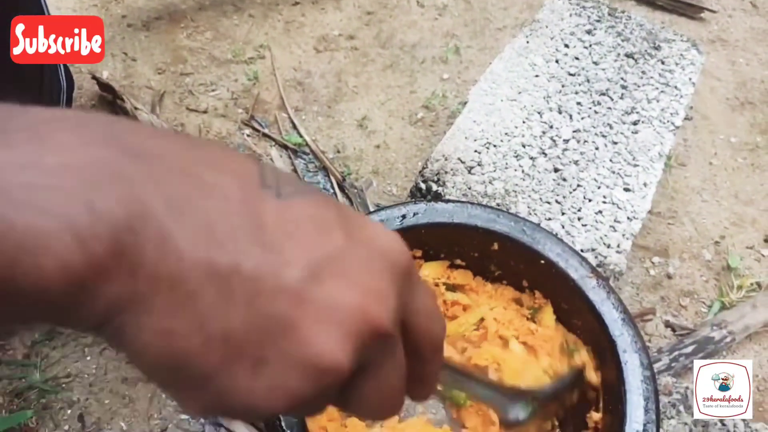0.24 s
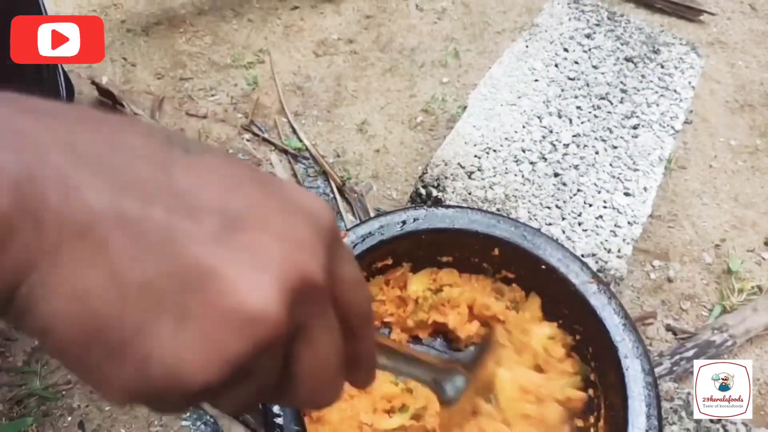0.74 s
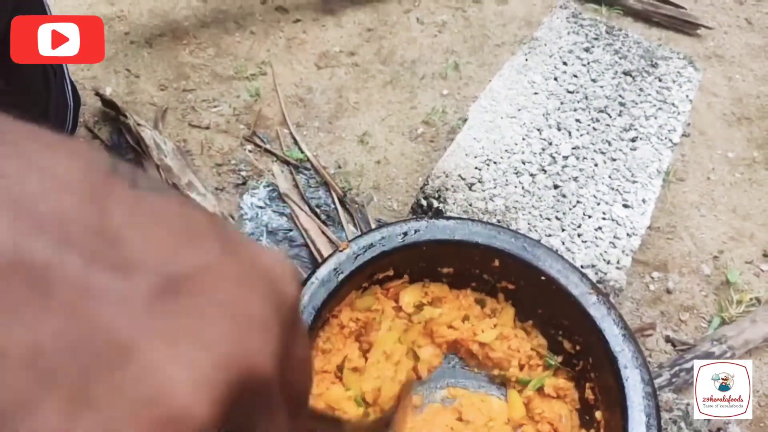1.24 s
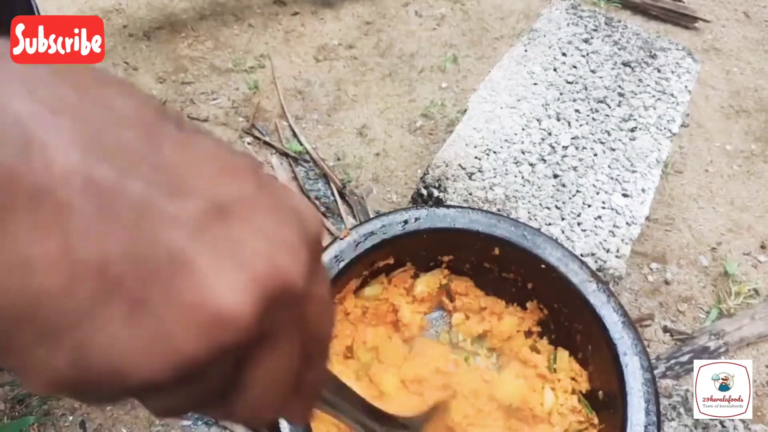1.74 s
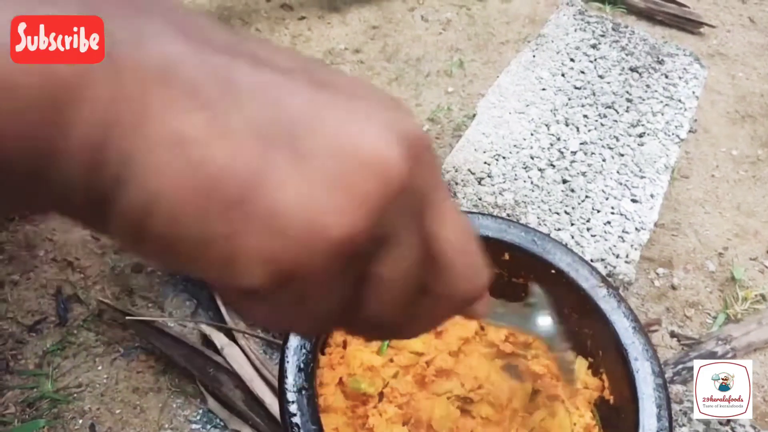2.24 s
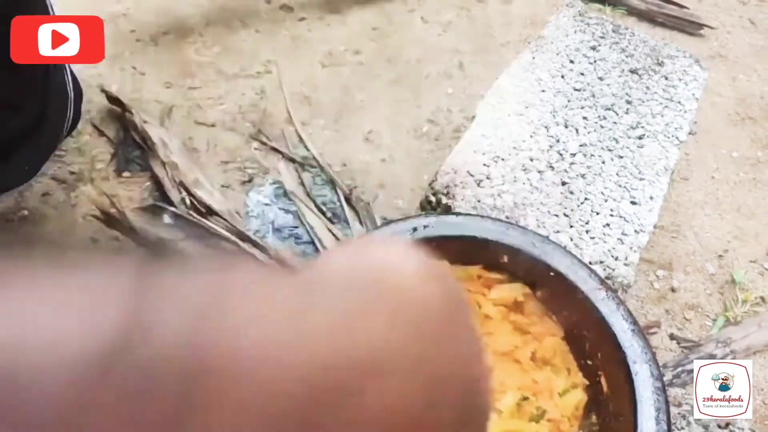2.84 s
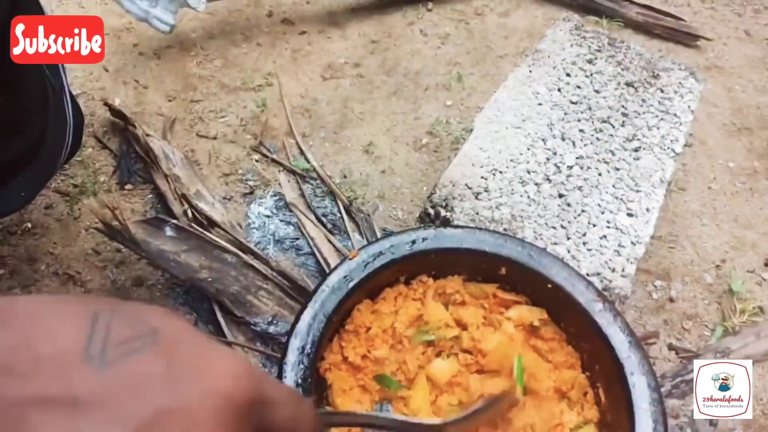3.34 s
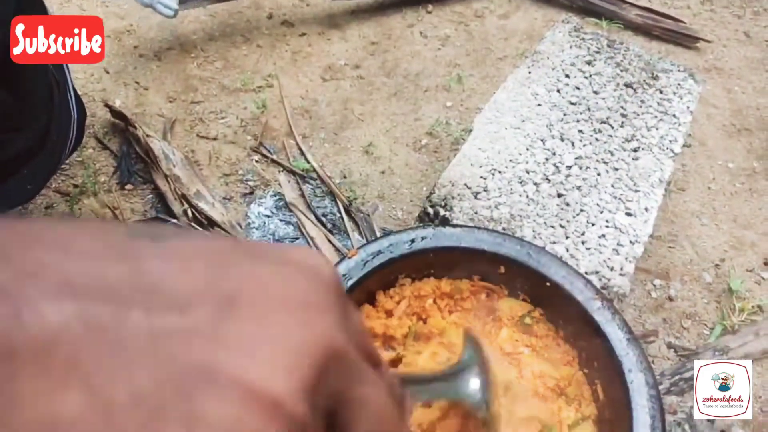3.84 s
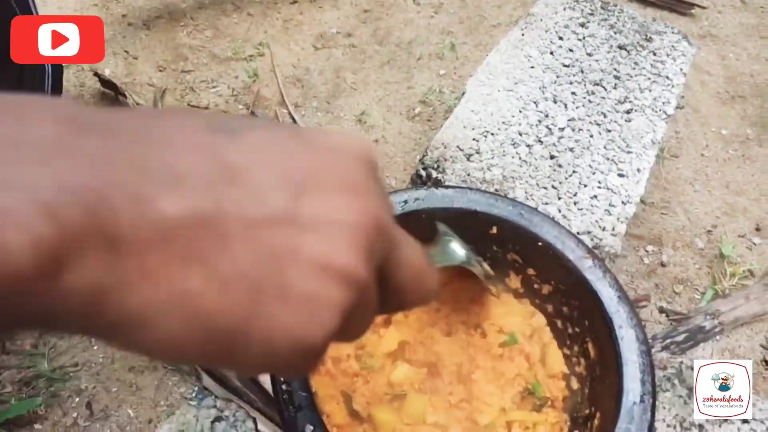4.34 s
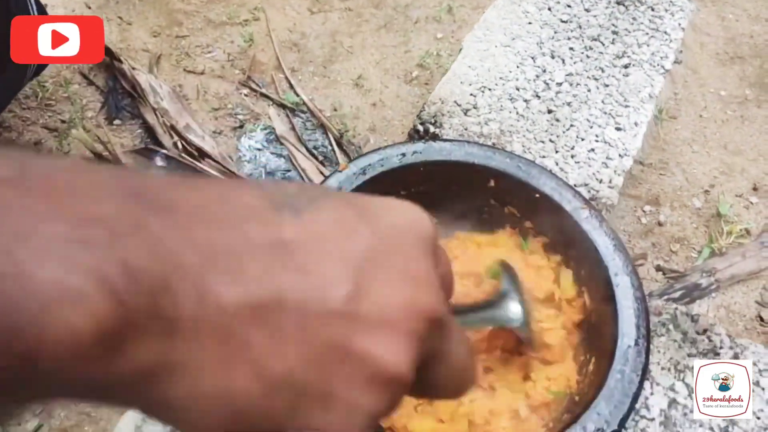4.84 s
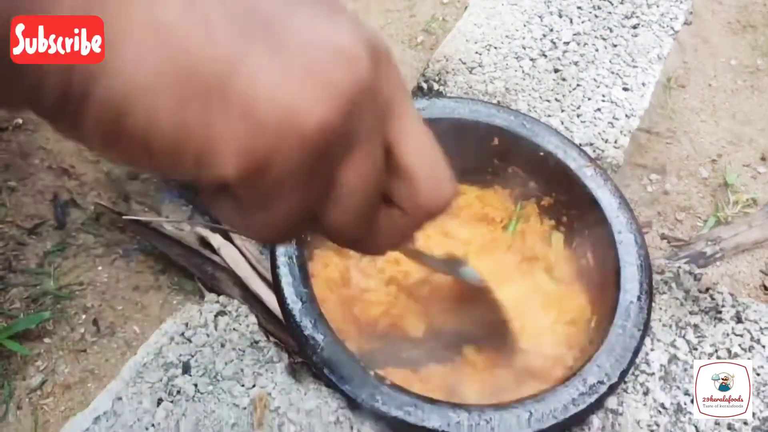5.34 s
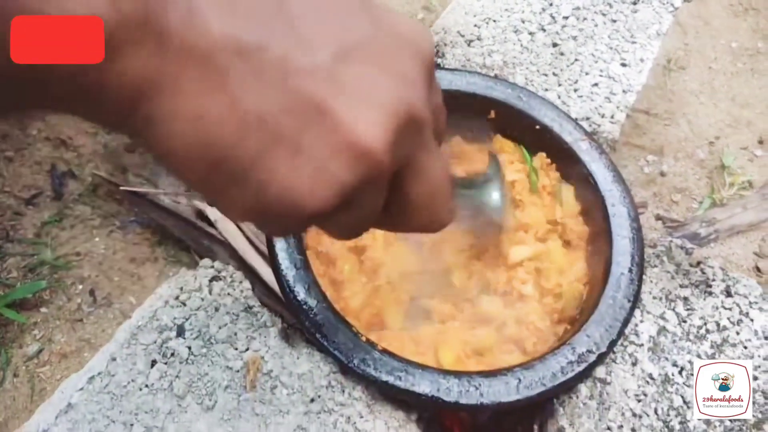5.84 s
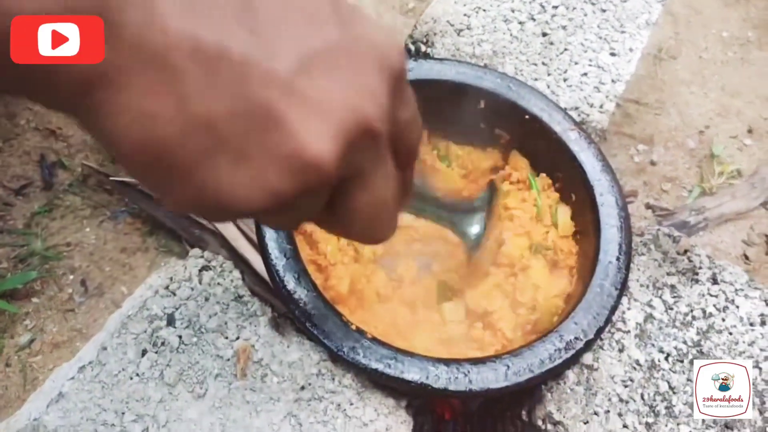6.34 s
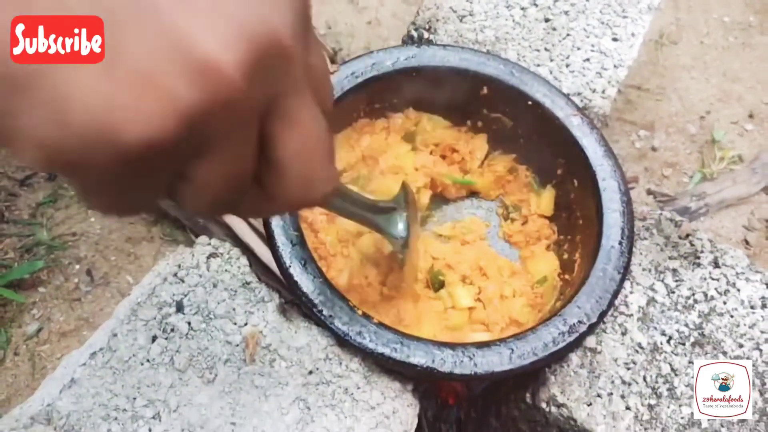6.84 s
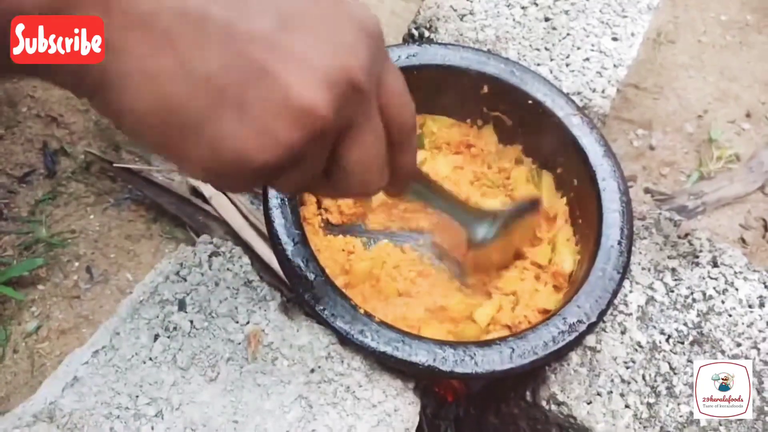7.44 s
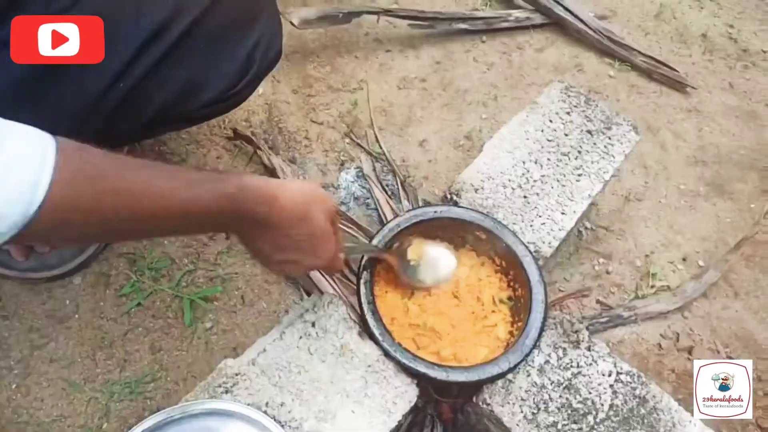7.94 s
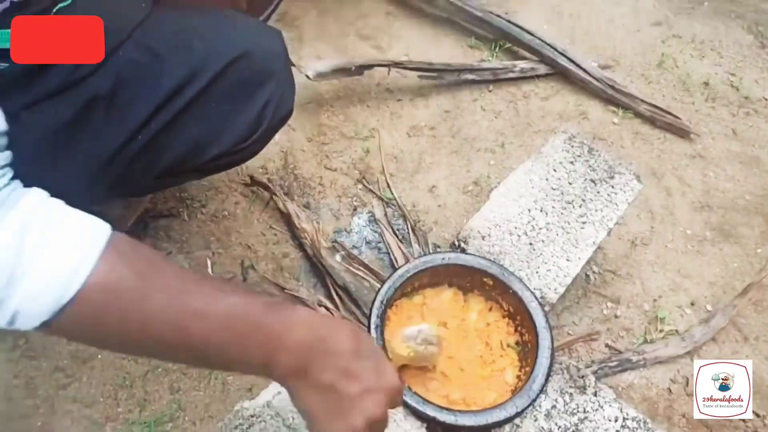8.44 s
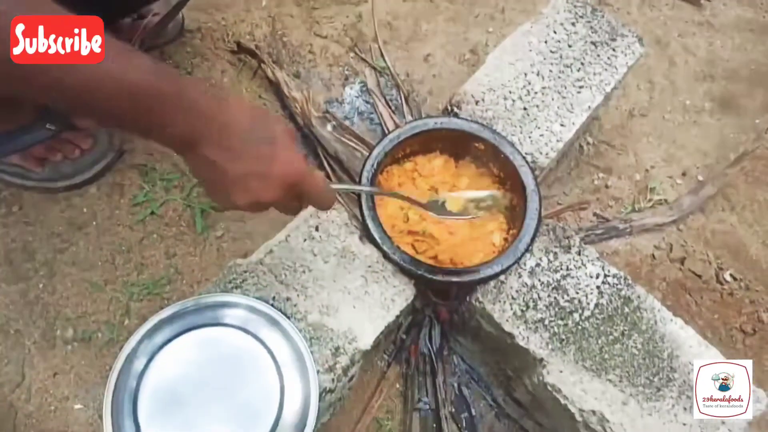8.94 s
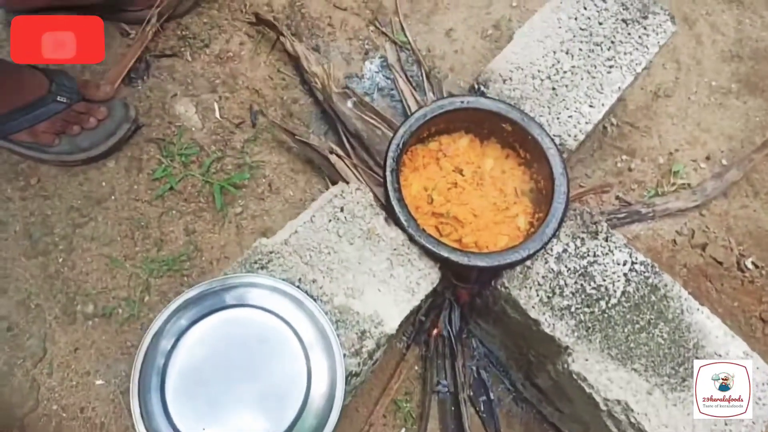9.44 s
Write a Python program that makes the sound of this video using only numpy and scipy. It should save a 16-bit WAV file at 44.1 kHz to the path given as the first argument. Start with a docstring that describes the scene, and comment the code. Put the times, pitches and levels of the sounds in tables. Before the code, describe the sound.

A steel spoon works through thick curry in a clay pot, rasping over the wall, thudding through the food and clinking on bare clay, with light squelches and occasional squeaks. A soft, steady sizzle runs underneath, heard close up in stereo outdoors. The strokes slacken briefly around three seconds in and resume, until spoon and sizzle stop abruptly and only quiet outdoor air remains.

```python
"""Outdoors at a wood fire, stereo microphone close to a heavy clay pot of thick, softly sizzling curry. Almost
at once a steel spoon starts to stir: it drags grit over the clay, pops wet pockets, squeaks, knocks through the
food and clinks on the bare wall. Near 3 s it eases off for a second, then stirs on. At 7.7 s the scene changes
at once, and only quiet outdoor air is heard."""
import sys
import numpy as np
from scipy import signal
from scipy.fft import rfft, irfft
from scipy.io import wavfile
from scipy.ndimage import map_coordinates

SR = 44100
rng = np.random.default_rng(int(sys.argv[2]) if len(sys.argv) > 2 else 0)


def file_out(sig):
    """Save sig as 16-bit WAV at sys.argv[1]."""
    # one column per channel
    cols = np.atleast_2d(sig).T
    # limit, then scale
    lim = np.clip(cols, -1, 1)
    pcm = np.round(lim * 32767).astype(np.int16)
    wavfile.write(sys.argv[1], SR, pcm)


N = 427329
TIME = np.arange(N) / SR

# open air around the fireplace: f/Hz, relative density/dB
AIR_SPECTRUM = [(18, -61), (30, -31), (59, -21), (153, 1.5), (184, -6), (259, -1), (486, -10), (702, -10.5),
                (1390, -18), (2410, -16.5), (7870, -28), (8740, -31), (9460, -31.5), (11100, -31),
                (16000, -32)]
# how alike the air is on both sides of the microphone: f/Hz, left-right likeness
AIR_LIKENESS = [(60, 1.0), (240, 1.0), (950, 1.0), (3770, 1.0), (15000, 0.98)]
# curry frying close by: f/Hz, relative density/dB
SIZZLE_SPECTRUM = [(20, -21), (45, -7), (70, 0.5), (105, 3), (200, 0.5), (400, -3.5), (700, -1),
                   (1200, -7.5), (2400, -12), (4100, -10), (5300, -18), (6600, -8), (8400, -15),
                   (12500, -17.5), (15500, -14)]
# how alike the sizzle is on both sides: f/Hz, left-right likeness
SIZZLE_LIKENESS = [(60, .15), (150, 0.55), (600, 0.82), (1500, 0.2), (4000, 0.16), (14000, 0.18)]
# rise and fall of the sizzle's treble: t/s, gain/dB
FIZZ_GAIN = [(0, 0), (1.3, .8), (1.85, 2.5), (2.3, 0.4), (3.6, -0.1), (5.1, 1), (6.45, -2), (7.0, 2),
             (7.4, 1)]
# faint, thin whistles over the sizzle: t/s, length/s, first f/Hz, last f/Hz, level/dB
THIN_WHISTLES = [(0, 0.26, 3950, 4050, -57.5), (.3, 0.36, 4000, 4060, -61), (2.2, 0.13, 3500, 3610, -54.5)]
# resonances of the hollow pot: f/Hz, width/Hz, level/dB
BODY_MODES = [(104, 60, -20), (265, 63, -8.5), (322, 87, -4), (461, 150, -0.5), (606, 260, -1),
              (810, 110, -2.5), (1060, 390, -11.5)]
# resonances of its clay wall: f/Hz, width/Hz, level/dB
WALL_MODES = [(1070, 1170, 1), (1510, 200, 3), (1810, 270, 0), (2160, 520, 0), (2504, 150, -1),
              (2783, 27, -0.5), (3255, 370, -0.5)]
# resonances of the spoon: f/Hz, width/Hz, level/dB
STEEL_MODES = [(3830, 480, 0.5), (4336, 440, 1.5), (4900, 1600, -5.5), (5680, 240, -4), (6470, 510, 4),
               (6860, 160, 6.5), (7490, 330, 3.5), (8280, 570, 2), (9100, 170, 2), (11270, 5600, -7.5),
               (14900, 790, -9), (14120, 500, -7), (15200, 1000, -8.5)]
# the spoon's edge squeaks along the wall: t/s, length/s, first f/Hz, last f/Hz, level/dB
EDGE_SQUEAKS = [(1.255, 0.031, 2370, 2250, -38.5), (2.548, 0.025, 4110, 3870, -30),
                (2.6, 0.042, 4350, 4350, -32), (5.64, 0.058, 1830, 1800, -35),
                (6.06, 0.12, 2110, 1830, -38.5), (6.122, 0.045, 1870, 1680, -32),
                (6.14, 0.17, 1800, 1750, -46.5), (6.198, 0.017, 1780, 1750, -27.5)]
# scraping strokes: t/s, length/s, force/dB, swell over the stroke/dB, wall against force/dB,
# steel against force/dB, brightening as the food is pushed aside/dB
SPOON_STROKES = [(0.307, 0.094, -29, 0.5, -6.5, -5, -7), (0.691, .015, -44, 8, -2, 0, 0),
                 (0.724, 0.1, -25, -4.5, -5, -5, -3), (1.053, 0.18, -26, 3, -9.5, -10, 2),
                 (1.354, 0.081, -31.5, -14.5, -2.5, -0.5, 0), (1.486, 0.16, -28, -9, -6, -2.5, 13),
                 (1.666, 0.011, -42, 4, 1, -16, 0), (2.019, 0.069, -29.5, -6, -5.5, -2.5, 0),
                 (2.148, 0.013, -41, -3, -6, -1, 1), (2.429, 0.035, -46, 8, 3, 8.5, 1),
                 (2.55, 0.097, -28, -7, -6, 3, -0.5), (2.684, 0.088, -45, -0.5, -5, -2, 3.5),
                 (2.859, 0.028, -37, -1, -3, -6, 0), (2.915, 0.014, -38, 1, -1, -0.5, -2),
                 (2.976, 0.033, -40, -2, 0, -1.5, -2), (4.132, 0.12, -37.5, 3.5, -5, 3.5, 0.5),
                 (4.308, 0.054, -38, -10, -3.5, 3, 10), (4.401, 0.02, -32.5, -0.5, -8, -1.5, -4),
                 (4.464, 0.057, -26, 0.5, -2.5, 5.5, -4), (4.525, 0.095, -31.5, -8, -7, -10, 5),
                 (4.862, 0.027, -32, -8.5, -9.5, -8, -2), (4.918, 0.088, -24, 1, -13, -17, 9.5),
                 (5.286, 0.018, -38.5, -8, 2.5, 3, 1), (5.363, 0.088, -23.5, -1, -10.5, -11, -4),
                 (5.489, 0.011, -33.5, 0, -11, -7, -6), (5.585, 0.087, -29, 7, -6.5, -10, -4.5),
                 (5.807, .105, -23.5, -7, -5, -6.5, 0.5), (5.926, 0.021, -33, -3, -5.5, -6, -3.5),
                 (6.015, 0.039, -33, -4, -10, -13, 7), (6.103, 0.26, -31, 5, -10.5, -12, -6),
                 (6.307, 0.039, -25.5, 2.5, -0.5, 1.5, -4), (6.766, .11, -26, -4, -7.5, -7, 3.5),
                 (7.11, 0.037, -36.5, -6.5, 2, 4, -4), (7.16, .097, -25.5, 1.5, -6, -5.5, -5),
                 (7.535, 0.22, -28, -8.5, -8.5, -7, 8)]
# the spoon meets the pot through a cushion of food: t/s, level/dB
FOOD_KNOCKS = [(0.0803, -28.5), (0.2822, -16.5), (0.3953, -21.5), (0.8254, -15), (0.9353, -33),
               (1.0655, -20.5), (1.1282, -23.5), (1.5209, -25.5), (1.6762, -32), (1.7824, -27),
               (2.0739, -36), (2.1706, -28), (2.4811, -16.5), (3.5625, -44), (3.8215, -39), (4.1243, -31.5),
               (4.2262, -25.5), (4.6355, -34), (4.8634, -20.7), (4.9726, -22.5), (5.3559, -28), (5.56, -26),
               (5.5752, -18.5), (5.79, -27.2), (6.7673, -26), (7.2168, -22), (7.2836, -22.5), (7.3963, -27),
               (7.427, -38), (7.4715, -36.5)]
# the spoon strikes bare clay: t/s, body/dB, wall/dB, steel/dB, chatter time/s, favoured ring f/Hz
CLAY_CLINKS = [(0.366, -29, -36, -28.5, 0.00088, 6420), (0.7126, -15.5, -25.5, -28, 0.0011, 6400),
               (0.729, -28.5, -43.5, -23.5, 0.00054, 8200), (0.7569, -22.5, -41.5, -23.5, 0.0006, 8120),
               (1.0498, -20.5, -25.5, -23, 0.002, 3970), (1.3552, -12.5, -13.5, -15.5, .0018, 4290),
               (1.4356, -22.5, -22, -33, 0.00084, 2300), (2.4413, -31, -32.5, -20, 0.0017, 6390),
               (2.4577, -25, -31, -26, 0.0027, 6670), (2.5505, -22, -35, -18.5, 0.00097, 6870),
               (2.5605, -30, -24, -23, 0.0015, 6850), (2.5775, -36, -35.5, -22, 0.0012, 7540),
               (2.611, -29, -36.5, -28.5, 0.00073, 4400), (2.6277, -30.5, -29, -24, .0011, 4260),
               (2.655, -27, -27.5, -21, 0.0015, 4330), (2.9201, -37, -35.5, -39, 0.0019, 2560),
               (2.977, -53, -37, -38, 0.0029, 2400), (3.762, -21.5, -25, -33.5, 0.00058, 1250),
               (4.164, -30, -57, -21, 0.00086, 6960), (4.4558, -20, -41.5, -24, .0003, 6430),
               (4.4988, -28, -37, -23.5, 0.0013, 6830), (4.8463, -22.5, -33, -39, 0.001, 3850),
               (5.29, -21.5, -23.5, -22, 0.0024, 4290), (6.0933, -39, -37.5, -39, 0.00087, 1920),
               (6.202, -32, -61, -54, .0018, 1810), (6.7355, -19, -32, -22.5, 0.00038, 6700),
               (6.842, -25, -28.5, -30.5, 0.0012, 6200), (7.0975, -22, -21, -12.5, 0.0023, 7490),
               (7.1562, -21, -20, -22, 0.0023, 7430)]
# landing nearer its thin edge, the spoon rings higher and brighter: favoured ring f/Hz, brightness/dB
EDGE_BRIGHTENING = [(2500, -9.5), (4200, -4.5), (6400, 5.5), (8000, 9)]
# the range that the thin edge brings out: f/Hz, weight of the brightness
EDGE_WEIGHT = [(4300, 0), (6500, .75), (8800, 1.2), (12000, 1.4), (16000, 0.81)]
# the pot's treble favours the left microphone: f/Hz, left minus right at full share/dB
LEFT_LEAN = [(800, 0.5), (1800, 0.5), (3200, -0.5), (5000, 5), (6500, 4.5), (8300, 3.5), (10000, 16),
             (12000, 6.5), (15000, 15)]
# a hollow in the treble of the cooking: f/Hz, gain/dB
TREBLE_DIP = [(8450, -1), (8700, -12), (9500, -8.5), (10400, -12.5), (11400, -27), (11650, -2.5)]


def amp(db):
    """Decibels to gain."""
    return 10 ** (np.asarray(db) / 20)


def unit_rms(x):
    """Scales to rms 1."""
    return x / np.sqrt(np.mean(x ** 2) + 1e-20)


def curve_at(points, hz):
    """Reads a curve on a log-frequency axis."""
    f, value = np.transpose(points)
    return np.interp(np.log(hz + 1), np.log(f + 1), value)


def equalise(x, gain):
    """Filters x by a gain that is a function of frequency."""
    return irfft(rfft(x) * gain(np.fft.rfftfreq(x.shape[-1], 1 / SR)), x.shape[-1])


def wander(hz):
    """Random drift of rms 1, up to the given rate."""
    knots = rng.standard_normal(N // 20)
    return unit_rms(np.interp(TIME * hz, np.arange(len(knots)), knots))


def stereo(a, b, likeness):
    """Two unrelated signals become a left and a right of the given likeness."""
    return np.array([a, likeness * a + np.sqrt(1 - likeness ** 2) * b])


def grit(per_s, spread_db):
    """Random tiny clicks, a few of them much larger than the rest."""
    size = amp(spread_db * np.minimum(rng.exponential(1, N), 4))
    return unit_rms(size * rng.choice([-1, 1], N) * (rng.random(N) < per_s / SR))


def bed(a, b, spectrum, likeness):
    """Colours two unrelated signals into one stereo background of rms 1."""
    hz = np.fft.rfftfreq(N, 1 / SR)
    sides = stereo(rfft(a), rfft(b), curve_at(likeness, hz))
    return unit_rms(irfft(sides * amp(curve_at(spectrum, hz)), N))


def air(level_db=-63):
    """Faint, steady open air, almost the same on both sides."""
    return amp(level_db) * bed(*rng.standard_normal((2, N)), AIR_SPECTRUM, AIR_LIKENESS)


def sizzle(level_db=-42.5):
    """Countless steam bubbles burst in the hot curry; their fizz comes and goes."""
    bubbles = [grit(per_s=9000, spread_db=3.5) for side in range(2)]
    frying = amp(level_db + 0.52 * wander(hz=9)) * bed(*bubbles, SIZZLE_SPECTRUM, SIZZLE_LIKENESS)
    fizz = equalise(frying, lambda hz: 1 / (1 + (2000 / (hz + 1)) ** 2))
    fizz_db = np.interp(TIME, *np.transpose(FIZZ_GAIN))
    return frying + fizz * (amp(fizz_db) - 1)


def moving_resonance(x, hz, width_hz):
    """Shifts the pitch curve hz down to zero, smooths twice, and shifts back."""
    turn = np.exp(2j * np.pi * np.cumsum(hz) / SR)
    pole = np.exp(-np.pi * width_hz / SR)
    return (turn * signal.lfilter([(1 - pole) ** 2], [1, -2 * pole, pole ** 2], x / turn)).real


def glides(rows, width_hz, likeness):
    """Whistles or squeaks: rough, narrow tones that swell, slide in pitch and fade."""
    out = np.zeros((2, N))
    for start, length, first_hz, last_hz, db in rows:
        count = int(length * SR)
        noise = stereo(*rng.standard_normal((2, N))[:, :count], likeness)
        tone = moving_resonance(noise, np.linspace(first_hz, last_hz, count), width_hz)
        part = out[:, round(start * SR):][:, :count]
        part += amp(db) * unit_rms(tone * signal.windows.tukey(count, .7))
    return out


def ring(modes, narrowest_hz=70, size=4096):
    """Impulse response of steep-sided resonances; food and hand damp them, so none rings for long."""
    hz = np.abs(np.fft.fftfreq(2 * size, 1 / SR)) + 1
    power = sum(amp(db) ** 2 / (1 + ((hz / f - f / hz) * f / max(width, narrowest_hz)) ** 2) ** 2
                for f, width, db in modes)
    log_gain = .5 * np.log(power + 1e-9)
    minimum_phase = np.exp(np.conj(signal.hilbert(log_gain)))
    return np.fft.ifft(minimum_phase).real[None, :size]


def excite(force, response):
    """Lets a stereo force ring through a response."""
    return signal.fftconvolve(force, response, axes=1)[:, :force.shape[1]]


def pressure(dig_db_per_s=521, land_db_per_s=1100.5, lift_db_per_s=381, drag_db_per_s=127.5):
    """Body, wall and steel levels in dB: each stroke digs in, holds while it bares the clay, lifts off."""
    power = np.zeros((3, N))
    for start, length, force_db, swell_db, wall_db, steel_db, baring_db in SPOON_STROKES:
        near = slice(max(round((start - .3) * SR), 0), round((start + length + .3) * SR))
        t = TIME[near] - start
        early, late = np.maximum(-t, 0), np.maximum(t - length, 0)
        along = np.clip(t / length, 0, 1) - .5
        arch_db = .5 - (2 * along) ** 2
        held_db = force_db + swell_db * along + arch_db
        bared_db = held_db + baring_db * along
        # a stroke that begins with a clink is there almost at once
        landed = min(abs(start - clink[0]) for clink in CLAY_CLINKS) < .015
        contact = amp(-(land_db_per_s if landed else dig_db_per_s) * early - lift_db_per_s * late)
        # the spoon drags lightly through food before and after
        drag = amp(-24.5 - drag_db_per_s * (early + late) - (land_db_per_s * early if landed else 0))
        power[:, near] += ((contact + drag) * amp([held_db, bared_db + wall_db, bared_db + steel_db])) ** 2
    return 10 * np.log10(power + 1e-12)


def squelch(low_hz=700, high_hz=3970, decay_cycles=2.5, against_wall_db=-8):
    """Wet pockets in the curry pop at many pitches wherever the spoon presses through."""
    t, pops = np.arange(600) / SR, np.zeros((2, N))
    for hz in np.geomspace(low_hz, high_hz, 12):
        pop = np.sin(2 * np.pi * hz * t) * np.exp(-hz * t / decay_cycles)
        side_gain = amp(rng.normal(0, 2, (2, 1)))
        pops += side_gain * signal.oaconvolve(grit(per_s=9, spread_db=1.5), pop)[:N]
    wall_db = pressure()[1]
    return unit_rms(pops) * amp(against_wall_db + wall_db)


def add_blow(mix, start, db, sound):
    """Adds a short stereo sound whose level is counted over 10 ms."""
    power = np.sum(sound ** 2) / 2 / (SR / 100)
    part = mix[:, round(start * SR):][:, :sound.shape[1]]
    part += amp(db) * sound[:, :part.shape[1]] / np.sqrt(power + 1e-20)


def thud(hz, body, decay_s=0.0011, ring_db=-8, cushion_hz=1300):
    """A blow swells and dies in two or three cycles, dulled by the food; the pot rings on faintly."""
    t = np.arange(4096) / SR
    push = unit_rms(t * np.exp(-t / decay_s) * np.sin(2 * np.pi * hz * t))
    tremor = rng.standard_normal(len(t)) * np.exp(-t / 0.0075) * (1 - np.exp(-t / 0.0018))
    blow = push + amp(ring_db) * unit_rms(excite(np.array([tremor, tremor]), body))
    return signal.sosfilt(signal.butter(2, cushion_hz, fs=SR, output="sos"), blow)


def knocks(body, pitch_hz=546.7, scatter=0.035):
    """Dull blows through the food, each at a slightly different pitch."""
    out = np.zeros((2, N))
    for start, db in FOOD_KNOCKS:
        add_blow(out, start, db, thud(pitch_hz * (1 + scatter * rng.standard_normal()), body))
    return out


def struck(modes, ring_hz, scatter_db=1.9, favour_db=5):
    """Each blow lands elsewhere: resonances near ring_hz stand out, and all are weighted anew."""
    hz, width, db = np.transpose(modes)
    favour = np.exp(-((hz - ring_hz) / 260) ** 2)
    return ring(zip(hz, width, db + favour_db * favour + scatter_db * rng.standard_normal(len(hz))))


def clinks(body):
    """On bare clay the steel chatters for a few milliseconds while the pot thuds."""
    out, t = np.zeros((2, N)), np.arange(4096) / SR
    for start, body_db, wall_db, steel_db, chatter_s, ring_hz in CLAY_CLINKS:
        chatter = t / chatter_s * np.exp(-t / chatter_s) + 0.046 * np.exp(-t / 0.032)
        contact = rng.standard_normal((2, len(t))) * chatter
        bright_db = curve_at(EDGE_BRIGHTENING, ring_hz)
        steel = excite(stereo(*contact, likeness=0.2), struck(STEEL_MODES, ring_hz))
        steel = equalise(steel, lambda hz: amp(bright_db * curve_at(EDGE_WEIGHT, hz)))
        steel *= amp(.35 * bright_db * np.array([[.5], [-.5]]))  # a brighter blow lies further left
        add_blow(out, start, steel_db, steel)
        add_blow(out, start, body_db, thud(607, body, decay_s=0.0012, ring_db=-3))
        wall = excite(stereo(*contact, likeness=0.57), struck(WALL_MODES, ring_hz))
        add_blow(out, start, wall_db, wall)
    return out


def roam(x, depth_db, width_hz, hold_s):
    """As the contact point travels, it favours now some resonances, now others."""
    frames = dict(fs=SR, nperseg=512, noverlap=384)
    hz, t, spectra = signal.stft(x, **frames)
    place = np.meshgrid(hz / width_hz, t / hold_s, indexing="ij")
    favour = unit_rms(map_coordinates(rng.standard_normal((256, 512)), place, order=1, mode="wrap"))
    gain = amp(depth_db * np.clip(favour, -2, 1.6))
    # the colour changes, the loudness does not
    power = np.mean(abs(spectra) ** 2, axis=(0, 2))[:, None]
    gain /= np.sqrt(np.sum(power * gain ** 2, axis=0) / np.sum(power))
    return unit_rms(signal.istft(spectra * gain, **frames)[1][:, :N])


def scrape(body, wall, steel):
    """The spoon sticks and slips over grit; each catch rings the pot, its wall and the steel."""
    body_db, wall_db, steel_db = pressure()
    slip = wander(hz=171.1)
    coarse = grit(per_s=700, spread_db=2.5)
    fine_left, fine_right = [grit(per_s=5000, spread_db=2.5) for side in range(2)]
    body_force = stereo(coarse, fine_right, likeness=0.95) * amp(1.5 * slip)
    wall_force = stereo(unit_rms(fine_left + coarse), fine_right, likeness=0.24) * amp(2.0 * slip)
    steel_force = stereo(unit_rms(fine_left + .4 * coarse), fine_right, likeness=0.027) * amp(2.2 * slip)
    hollow, rasp, hiss = excite(body_force, body), excite(wall_force, wall), excite(steel_force, steel)
    # sliding through food drives the wall more softly than a blow does
    rasp = equalise(rasp, lambda hz: amp(-3.5 * np.log2(np.clip(hz, 900, 4000) / 1800)))
    hollow = roam(hollow, depth_db=4, width_hz=150, hold_s=.03) * amp(body_db)
    rasp = roam(rasp, depth_db=4.6, width_hz=230, hold_s=.04) * amp(wall_db)
    hiss = roam(hiss, depth_db=4.2, width_hz=280, hold_s=.05) * amp(steel_db)
    # steel pressed hard on bare clay cuts brighter than steel sliding on food
    top = equalise(hiss, lambda hz: 1 / (1 + (9500 / (hz + 1)) ** 12))
    top_db = 0.2 * np.clip(steel_db + 28.5, -12, 12)
    return hollow + rasp + hiss + top * (amp(top_db) - 1)


def lean_left(x, share):
    """Turns the treble towards the left microphone."""
    return equalise(x, lambda hz: amp(np.outer([.5, -.5], share * curve_at(LEFT_LEAN, hz))))


def scene(stop_s=7.742, crossfade_s=0.046):
    """Spoon and sizzle at close range, then an abrupt change to quiet air."""
    body, wall, steel = ring(BODY_MODES), ring(WALL_MODES), ring(STEEL_MODES)
    spoon = scrape(body, wall, steel) + squelch() + knocks(body) + clinks(body)
    spoon += glides(EDGE_SQUEAKS, width_hz=200, likeness=0.95)
    background = lean_left(sizzle(), share=0.36) + glides(THIN_WHISTLES, width_hz=100, likeness=0.3)
    cooking = background + lean_left(spoon, share=0.69)
    cooking = equalise(cooking, lambda hz: amp(curve_at(TREBLE_DIP, hz)))
    stopped = np.clip((TIME - stop_s) / crossfade_s + .5, 0, 1)
    return cooking * (1 - stopped) + air() * stopped


def record(dry):
    """The microphone's bass roll-off, full-scale clipping and the band limit."""
    dry = signal.sosfilt(signal.butter(1, 60, "highpass", fs=SR, output="sos"), dry)
    low_pass = signal.firwin(511, 15900, window=("kaiser", 9), fs=SR)
    return signal.oaconvolve(np.clip(dry, -1, 1), low_pass[None], "same")


dry = scene()
out = record(dry)
file_out(out)
```